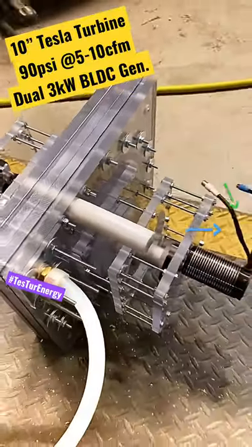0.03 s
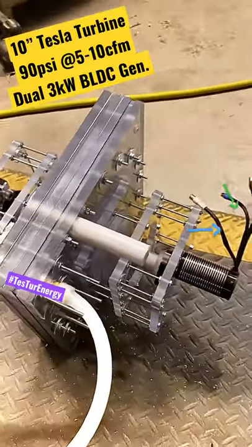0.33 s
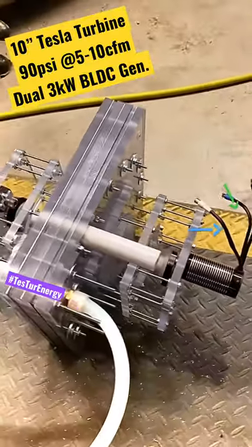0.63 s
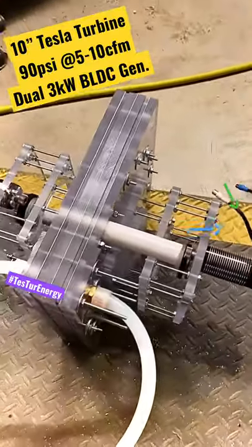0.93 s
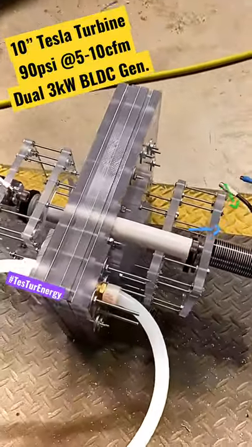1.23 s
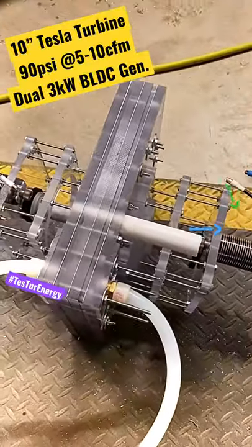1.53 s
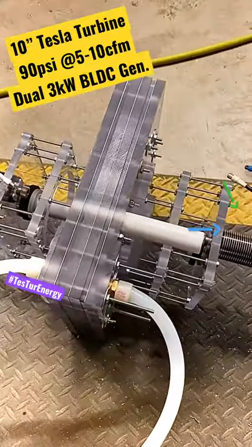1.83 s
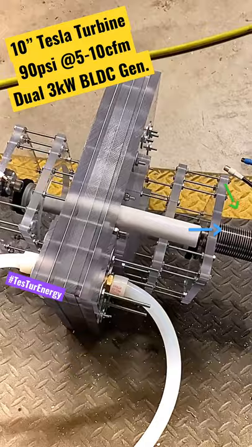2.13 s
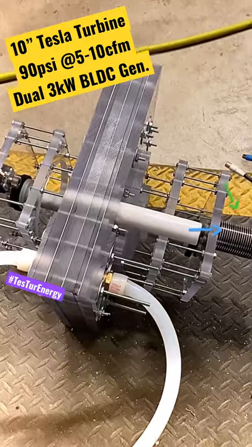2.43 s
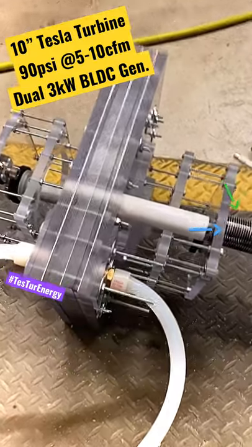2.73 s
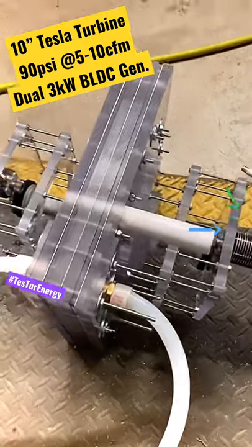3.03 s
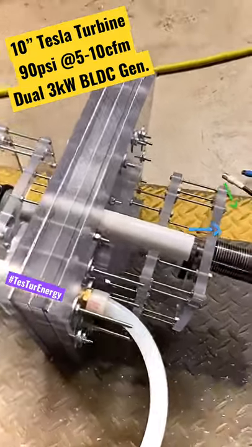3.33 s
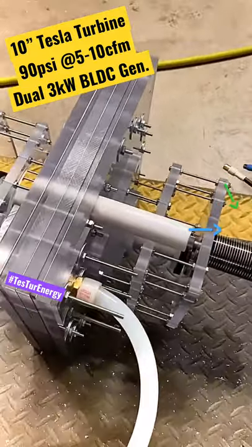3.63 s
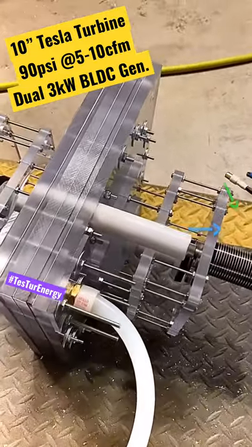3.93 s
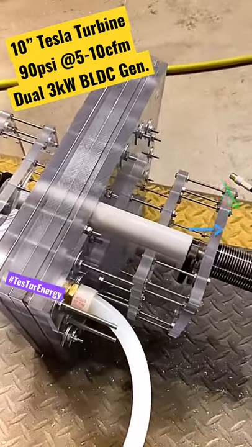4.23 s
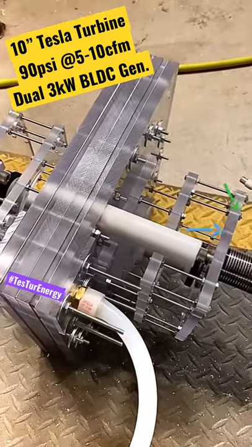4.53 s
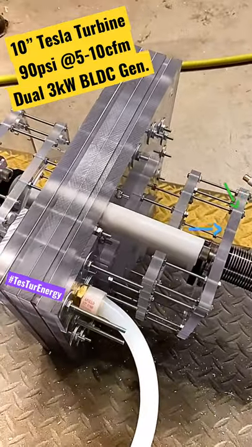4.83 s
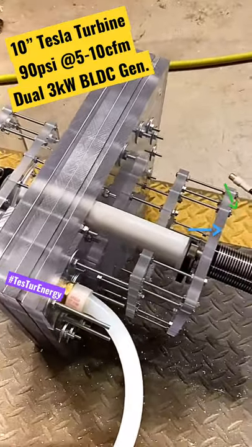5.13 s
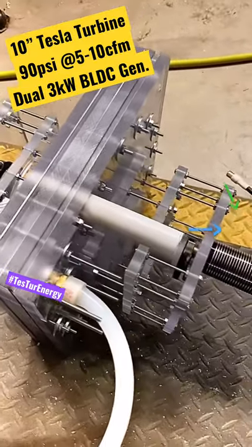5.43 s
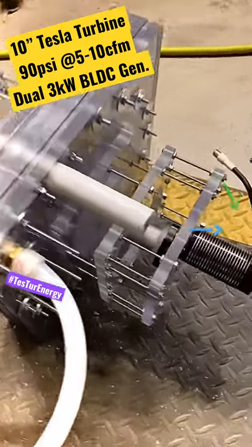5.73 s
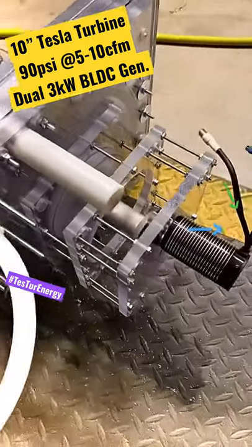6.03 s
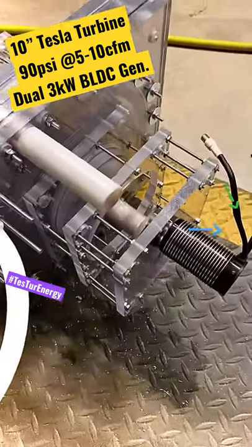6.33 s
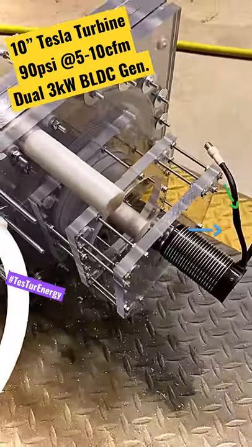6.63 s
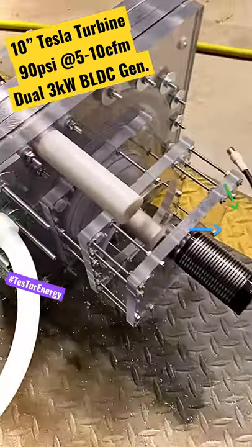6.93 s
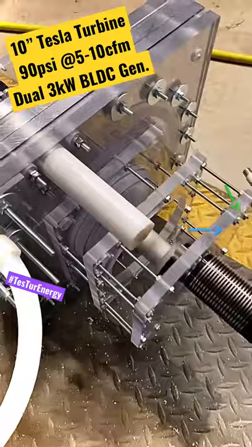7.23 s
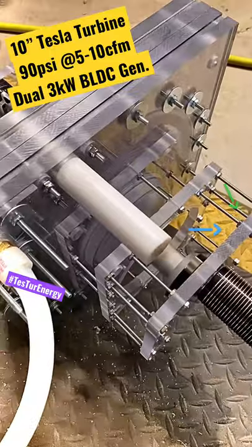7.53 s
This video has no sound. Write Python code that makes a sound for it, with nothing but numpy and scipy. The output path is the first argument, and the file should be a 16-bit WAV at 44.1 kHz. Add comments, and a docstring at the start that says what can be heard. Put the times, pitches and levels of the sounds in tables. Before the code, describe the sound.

From the first moment, compressed air roars through a turbine, dense and continuous, with a bright nozzle hiss on top. It is heard from nearby in a workshop with very little echo. Within the rush, the generators whine in several tones that swell and fade as the pitch climbs steadily, more than doubling over about eight seconds. At first the whine throbs in rapid chirps alongside a high flutter from the casing. The flutter dies away over the first few seconds, while the throbbing gets faster and smoother. One light, short knock comes at about 2.4 seconds. A faint low hum and rumble from the shaft grow with the speed. Between about 5.3 and 6.1 seconds the microphone moves closer and the air changes colour slightly. The roar, hiss and rising whine carry on to the end, a little louder than they began.

```python
"""A roar of air and a bright hiss, with a throbbing whine that climbs ever faster.
Compressed air spins up a disc turbine driving two generators on a workshop floor. The exhaust roars
through the casing and the nozzle hisses; the generators' cogging sweeps through the frame's resonances,
swelling once a turn over a faint shaft hum. A casing flutter dies away as the speed builds, one light
knock passes, and near the end the air changes colour as the listener moves in closer."""
import sys
import numpy as np
from scipy import signal
from scipy.fft import rfft, irfft, next_fast_len
from scipy.io import wavfile
from scipy.ndimage import uniform_filter1d

SR = 44100
rng = np.random.default_rng(int(sys.argv[2]) if len(sys.argv) > 2 else 0)


def log_audio(samples):
    """Write samples as a 16-bit WAV file to the path given in sys.argv[1]."""
    # one column per channel
    frames = np.atleast_2d(samples).T
    # limit to full scale, then quantise
    limited = np.clip(frames, -1, 1)
    pcm = np.round(limited * 32767).astype(np.int16)
    wavfile.write(sys.argv[1], SR, pcm)


N = 343098
TIME = np.arange(N) / SR
FFT_SIZE = next_fast_len(N)
FREQ = np.fft.rfftfreq(FFT_SIZE, 1 / SR)
THROB_LEAD_TURNS = .37  # whine and flutter swell at the same point of each turn

# Level rides on the air as the listener drifts around the casing.
# Each row: time in seconds, roar gain in dB, gain of the top of the hiss in dB.
DRIFT_LEVELS = [(0, 1.2, -.3), (.6, 1, -.6), (1, .3, 0), (2.6, 0, 0), (3.4, -.4, .5), (5, -.3, .5),
                (5.55, .2, 0), (5.8, .6, -1.5), (6.2, 1, 1.3), (6.65, -.4, -.3), (7, -.2, -.4),
                (7.4, 0, -1.6)]


def undb(db):
    """Decibels to gain."""
    return 10 ** (np.asarray(db) / 20)


def over_freq(points):
    """A curve through points joined on a log-frequency axis."""
    hz, value = np.transpose(points)
    return np.interp(np.log(FREQ + 1), np.log(hz), value)


def bell(centre_hz, width_hz):
    """Power response of one resonance, 1 at its centre."""
    return 1 / (1 + (2 * (FREQ - centre_hz) / width_hz) ** 2)


def wander(rate_hz):
    """Smooth random drift with a spread of 1: held values, slewed twice."""
    hold = max(int(SR / rate_hz), 1)
    steps = np.repeat(rng.standard_normal(N // hold + 1), hold)
    drift = uniform_filter1d(uniform_filter1d(steps, hold), hold)[:N]
    return drift / drift.std()


def shaft_speed():
    """Turns per second of the accelerating rotor."""
    # The spin-up. Each row: time in seconds, speed in turns per second.
    spin_up = [(0, 11.7), (1.2, 13.68), (1.8, 14.82), (2.4, 15.91), (3.1, 17.3), (4.2, 19.46), (4.5, 20.17),
               (4.95, 21.09), (5.5, 22.4), (6, 23.67), (6.45, 24.85), (6.8, 25.74), (7.78, 28.42)]
    return np.interp(TIME, *np.transpose(spin_up))


def speed_gain_db(speed, start_db, doubling_db):
    """A gain that changes by the same step with each doubling of the rotor's speed."""
    return start_db + doubling_db * np.log2(speed / speed[0])


def throb(turns, depth, lead_turns=.45):
    """The slightly eccentric rotor swells the sound once a turn."""
    return 1 + depth * np.cos(2 * np.pi * (turns + lead_turns))


def nearness(initial=.25):
    """How close the listener is, from 0 afar to 1 close by; each move eases in and out."""
    # A small move back, then one in. Each row: start in seconds, length in seconds, change of nearness.
    moves = [(0, 0.74, -0.25), (5.3, 0.82, 1.0)]
    near = initial
    for start, length, change in moves:
        progress = np.clip((TIME - start) / length, 0, 1)
        near = near + change * np.sin(np.pi / 2 * progress) ** 2
    return np.clip(near, 0, 1)


def to_stereo(spectrum):
    """One wave reaches left and right with a phase difference."""
    # Each row: frequency in Hz, lead of the left side over the right in radians.
    left_lead = [(0, 0), (750, -.65), (1400, .1), (4000, .8), (5000, 1.7), (6000, 1.8), (8000, 3.1),
                 (12000, 3.2), (16000, 5.9)]
    half_lead = np.exp(.5j * np.interp(FREQ, *np.transpose(left_lead)))
    return spectrum * np.array([half_lead, 1 / half_lead])


def turbulence(tone_curve):
    """Rushing air: a direct wave plus room scatter, its casing colour shifting as the listener nears."""
    # The direct part of the air noise. Each row: frequency in Hz, share of power common to both sides.
    direct_share = [(60, .995), (400, .94), (1000, .7), (1800, .88), (3000, .7), (4800, .55), (7000, .82),
                    (8300, .995), (11800, .995), (13500, .7), (16000, .65)]
    # Resonances and notches of the casing and the floor beneath.
    # Each row: centre in Hz, width in Hz, lift from afar in dB, lift close by in dB.
    casing_bands = [(284, 62, 4.7, 6.4), (324, 24, .7, -1.5), (383, 32, 2.5, 3), (440, 35, -2, 0),
                    (499, 28, 2.9, 1.3), (575, 125, -1, -2.3), (689, 110, 1.5, -.2), (785, 50, -1.5, -1.5),
                    (1009, 216, 2.6, 1.7), (1090, 104, -4.5, -2.3), (1177, 109, 1.8, -2.5),
                    (1322, 155, -2.8, 1), (1594, 64, 4, -1.4), (1627, 144, -4.7, -1.8),
                    (1775, 140, .3, 3.3), (1893, 92, 2.5, 1.2), (2113, 115, 1.2, 2.4), (2293, 91, 1.8, -1),
                    (2492, 65, -1.5, .1), (2541, 72, 1.8, -1.1), (2820, 170, 2.2, 3.6),
                    (3040, 151, .3, 3.6), (3242, 242, -3, -2.3), (3589, 220, 2.4, 1.8),
                    (3952, 161, .3, 1.4), (4271, 83, 1.5, 2.3), (4453, 142, -2.7, -1),
                    (4783, 281, 1.1, 2.5), (5060, 413, -3, -2.1), (5410, 220, 7.3, 1.5),
                    (5926, 359, 1.1, -2.1), (6045, 69, .7, 2.7), (7428, 290, .9, 2.3),
                    (8240, 150, 1.1, 1.3), (13226, 300, 1.3, -1.2), (14423, 870, -.3, 3.3)]
    common, left, right = rfft(rng.standard_normal((3, FFT_SIZE)))
    share = over_freq(direct_share)
    air = np.sqrt(share) * to_stereo(common) + np.sqrt(1 - share) * np.array([left, right])
    air = air * undb(over_freq(tone_curve)) * np.sqrt(SR / 2)
    far_db = sum(db * bell(hz, width) for hz, width, db, _ in casing_bands)
    close_db = sum(db * bell(hz, width) for hz, width, _, db in casing_bands)
    far, close = (irfft(air * undb(db))[:, :N] for db in (far_db, close_db))
    near = nearness()
    return (1 - near) * far + near * close


def bounces(sound, count=8, echo_db=-25, shortest_ms=1.5, longest_ms=10, sway_ms=.4):
    """Floor and plates return weak copies whose delays sway with the listener: a hollow, moving colour."""
    mix = sound
    for lag_ms in rng.uniform(shortest_ms, longest_ms, count):
        delay_s = (lag_ms + sway_ms * wander(.7)) / 1000
        echo = np.array([np.interp(TIME - delay_s, TIME, side, left=0) for side in sound])
        mix = mix + undb(echo_db) * echo
    return mix / np.sqrt(1 + count * undb(echo_db) ** 2)


def exhaust_roar(turns, speed, waver_db=.49, pan_right_db=.7):
    """Spent air roars out of the casing, a little to the right, pulsing with the rotor."""
    # The roar's broad tone curve. Each row: frequency in Hz, relative noise density in dB.
    roar_curve = [(30, -120), (48, -99), (100, -84.5), (200, -81.5), (300, -77), (450, -69.5), (800, -67.5),
                  (1300, -66), (2000, -65), (3000, -65), (4200, -65), (5200, -68.5), (7000, -74),
                  (10000, -117)]
    seconds, drift_db, _ = np.transpose(DRIFT_LEVELS)
    level_db = speed_gain_db(speed, start_db=-.85, doubling_db=2.79)
    level_db += np.interp(TIME, seconds, drift_db) + waver_db * wander(20)
    pan_db = np.array([[-pan_right_db], [pan_right_db]]) / 2
    return bounces(turbulence(roar_curve)) * undb(level_db + pan_db) * throb(turns, depth=.053)


def nozzle_hiss(turns, speed, waver_db=.4, top_hz=9000):
    """The jet's hiss wavers with the air supply; its top comes and goes as the listener moves."""
    # The jet's bright tone curve. Each row: frequency in Hz, relative noise density in dB.
    hiss_curve = [(3000, -88), (5500, -69), (7500, -63.5), (9000, -65), (10600, -70), (12300, -69.5),
                  (13300, -67.5), (14400, -68), (16000, -70.5)]
    seconds, _, top_db = np.transpose(DRIFT_LEVELS)
    jet = turbulence(hiss_curve)
    top = signal.sosfiltfilt(signal.butter(4, top_hz, "highpass", fs=SR, output="sos"), jet)
    top_gain = undb(np.interp(TIME, seconds, top_db))
    jet = jet + (top_gain - 1) * top
    level_db = speed_gain_db(speed, start_db=-1.3, doubling_db=2.2) + waver_db * wander(20)
    return jet * undb(level_db) * throb(turns, depth=.03)


def frame_ring(force, modes):
    """The frame rings wherever the driving force meets one of the given modes."""
    power = sum((undb(db) * bell(hz, width)) ** 2 for hz, width, db in modes)
    ringing = rfft(force, FFT_SIZE) * np.sqrt(power)
    return irfft(to_stereo(ringing))[:, :N]


def workshop(sound, t60_s=.2, wet_db=-18):
    """Direct sound and a faint, decaying scatter from the walls."""
    age = TIME[:SR // 2]
    tail = rng.standard_normal((2, len(age))) * undb(-60 * age / t60_s)
    tail /= np.sqrt(np.sum(tail ** 2, axis=1, keepdims=True))
    return sound + undb(wet_db) * signal.fftconvolve(sound, tail, axes=1)[:, :N]


def generator_whine(turns, speed, gain_db=1.3, unevenness=.6, swing_rad=.3, jitter_rad=.3, gap_points=20):
    """Magnets pass the stator teeth; each harmonic sings out as it crosses one of its frame modes."""
    # Frame modes, driven by the cogging (54 times a turn), its harmonics or other shaft multiples.
    # Each row: driving multiple of the shaft speed, centre in Hz, width in Hz, relative level in dB.
    frame_modes = [(54, 755, 35, -50), (54, 865, 38, -45), (54, 955, 55, -47), (54, 1015, 55, -46.5),
                   (54, 1185, 50, -50), (54, 1330, 75, -39.5), (54, 1465, 70, -42), (53, 1450, 65, -43),
                   (65, 1810, 70, -45), (108, 1510, 70, -49), (112, 1580, 80, -46), (108, 1602, 66, -34.8),
                   (104, 1600, 80, -45.5), (108, 1760, 110, -43), (108, 1885, 50, -49),
                   (108, 2105, 48, -36), (108, 2160, 65, -38.5), (108, 2285, 75, -39.5),
                   (110, 2285, 60, -44.5), (108, 2440, 110, -43), (108, 2565, 140, -35.5),
                   (108, 2675, 100, -31), (108, 2825, 115, -36), (106, 2950, 100, -43),
                   (108, 3040, 110, -37.5), (99, 2710, 90, -41), (162, 2810, 120, -45),
                   (162, 3560, 130, -44), (174, 3900, 160, -42), (130, 2980, 220, -42),
                   (161, 3810, 140, -38.5), (162, 3970, 90, -43.5), (162, 4320, 150, -48)]
    angle = 2 * np.pi * (turns + THROB_LEAD_TURNS)
    # up to 15 turns a second the frame shakes fully and chops the whine into chirps; then it smooths out
    shake = np.minimum(15 / speed, 1)
    drive = throb(turns, depth=shake ** 1.1, lead_turns=THROB_LEAD_TURNS)
    around_rotor = np.arange(gap_points) / gap_points
    whine = 0
    for multiple in sorted({row[0] for row in frame_modes}):
        # the gap to the teeth is uneven around the rotor, in the same way on every turn
        bumps = (rng.standard_normal(gap_points) + 1j * rng.standard_normal(gap_points)) / np.sqrt(2)
        gap = np.interp(turns % 1, around_rotor, bumps - bumps.mean(), period=1)
        phase = multiple * angle + swing_rad * np.sin(angle) + jitter_rad * shake * wander(200)
        force = drive * np.real((1 + unevenness * shake * gap) * np.exp(1j * phase))
        driven_modes = [row[1:] for row in frame_modes if row[0] == multiple]
        whine = whine + np.sqrt(2) * frame_ring(force, driven_modes)
    return workshop(undb(gain_db) * whine)


def shaft_hum(turns, speed, growth=2.2, waver_db=1.0, rumble_db=-61, rumble_hz=(70, 160)):
    """The rotor hums and rumbles in its bearings, growing with speed."""
    # Hum partials. Each row: multiple of the shaft speed, level in dB at 24 turns a second.
    partials = [(2, -89), (4, -65), (6, -60), (8, -67), (10, -67)]
    hum = 0
    for multiple, db in partials:
        amplitude = np.sqrt(2) * undb(db + waver_db * wander(5))
        hum = hum + amplitude * np.sin(2 * np.pi * (multiple * turns + rng.random()))
    low_band = signal.butter(2, rumble_hz, "bandpass", fs=SR, output="sos")
    rumble = signal.sosfilt(low_band, rng.standard_normal(N))
    return (hum + undb(rumble_db) * rumble / rumble.std()) * (speed / 24) ** growth


def casing_flutter(turns, speed, centre_hz=2830, width_hz=380):
    """The slow rotor shakes a casing resonance once a turn; it dies away as the shaft gains speed."""
    band = rfft(rng.standard_normal(FFT_SIZE)) * bell(centre_hz, width_hz)
    ring = irfft(to_stereo(band))[:, :N]
    level_db = speed_gain_db(speed, start_db=-37, doubling_db=-32)
    return ring / ring.std() * undb(level_db) * throb(turns, depth=.6, lead_turns=THROB_LEAD_TURNS)


def knock(start_s=2.398, pitch_hz=370, level_db=-35, t60_s=.025):
    """One light knock right by the listener: a damped tone pushing left and right in opposite ways."""
    age = np.maximum(TIME - start_s, 0)
    envelope = undb(level_db - 60 * age / t60_s)
    return envelope * np.sin(2 * np.pi * pitch_hz * age) * np.array([[1], [-1]])


def scene():
    """The shaft's speed drives the rush of air, the whine, the hum and the flutter; one knock joins."""
    speed = shaft_speed()
    turns = np.cumsum(speed) / SR
    air = exhaust_roar(turns, speed) + nozzle_hiss(turns, speed)
    machine = generator_whine(turns, speed) + shaft_hum(turns, speed) + casing_flutter(turns, speed)
    return air + machine + knock()


def record(dry):
    """A steep low-pass cuts the very top of the hiss."""
    top_cut = signal.ellip(12, rp=.1, rs=90, Wn=15800, fs=SR, output="sos")
    return signal.sosfilt(top_cut, dry)


dry = scene()
out = record(dry)
log_audio(out)
```